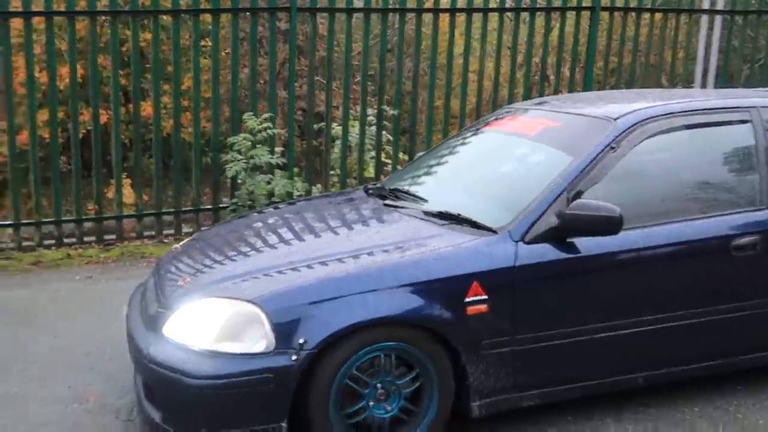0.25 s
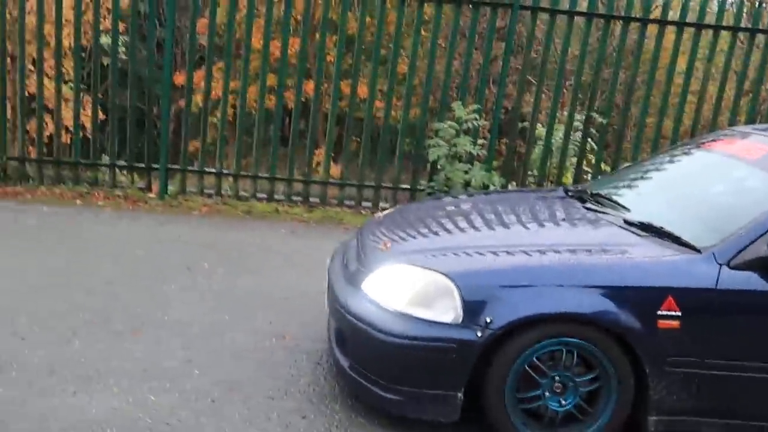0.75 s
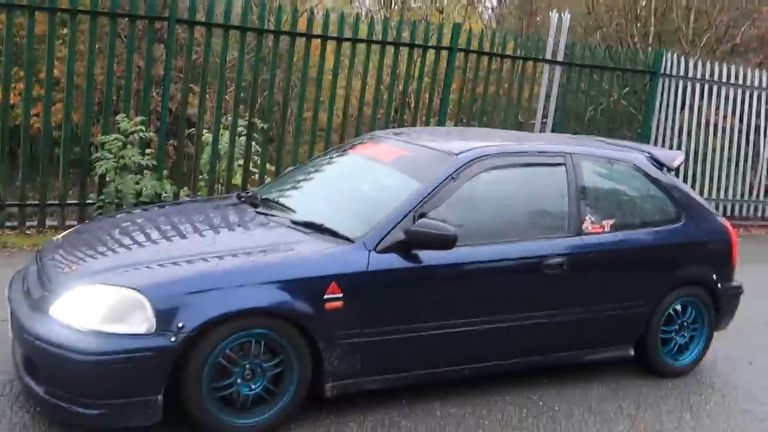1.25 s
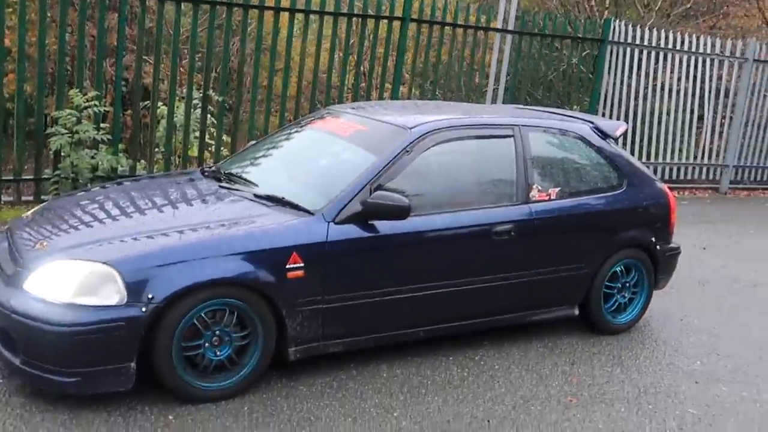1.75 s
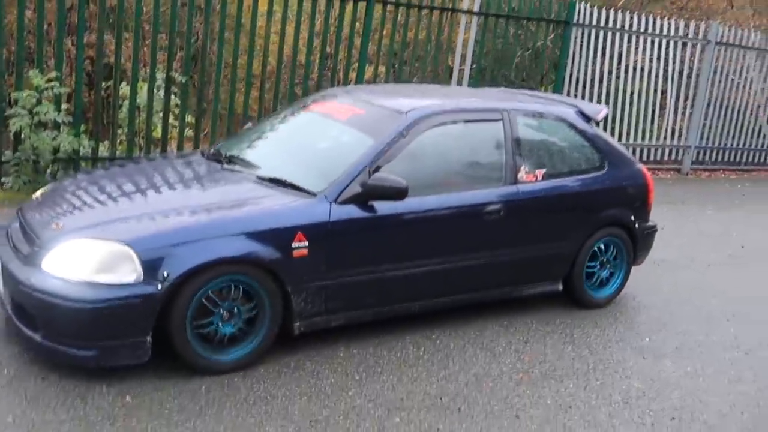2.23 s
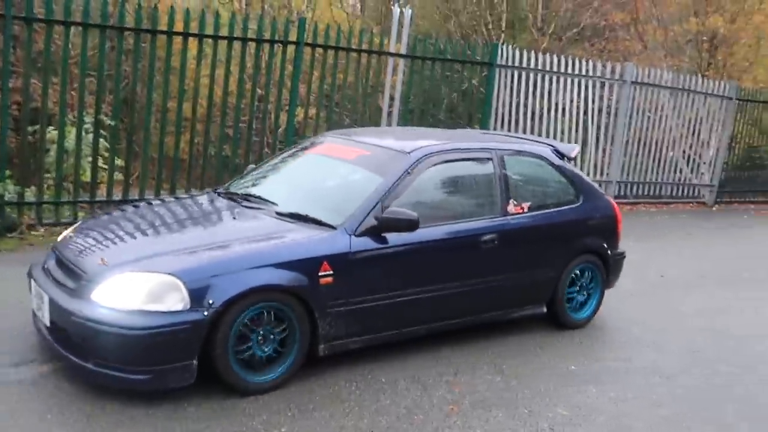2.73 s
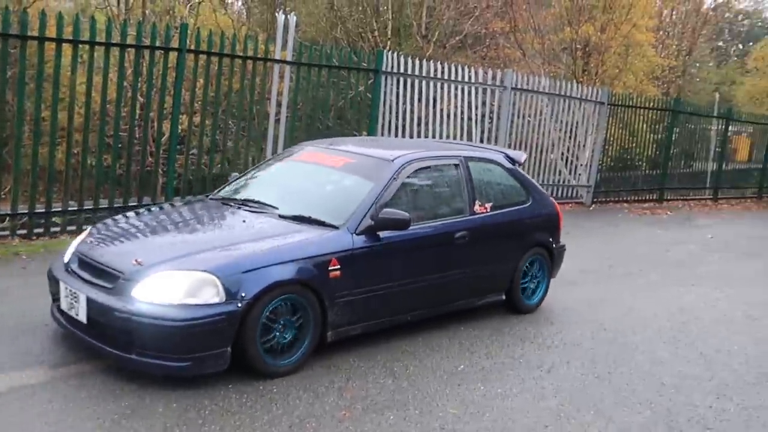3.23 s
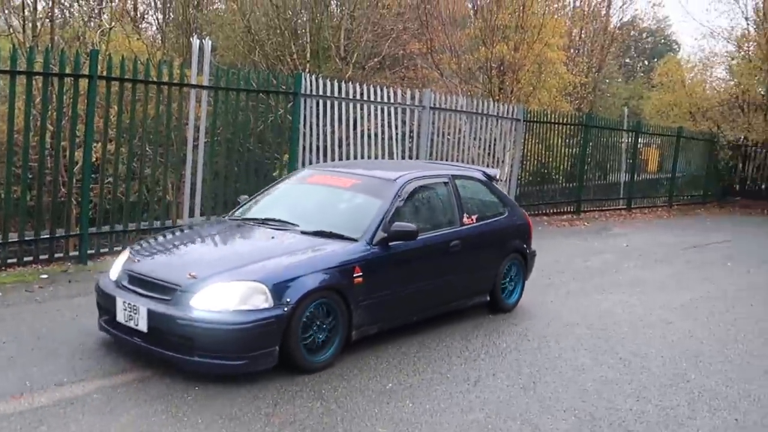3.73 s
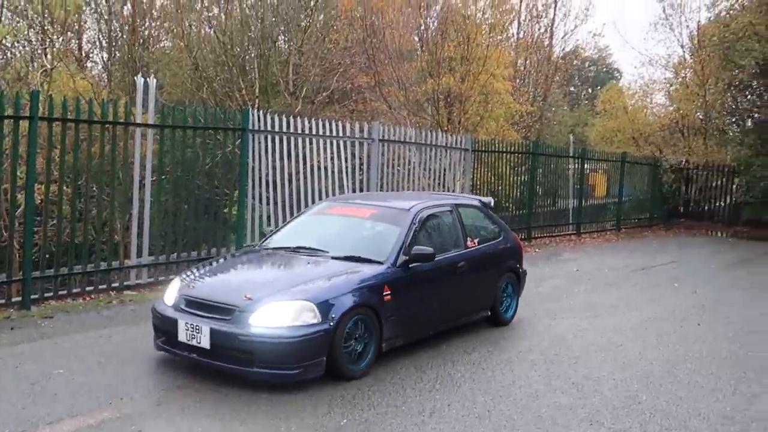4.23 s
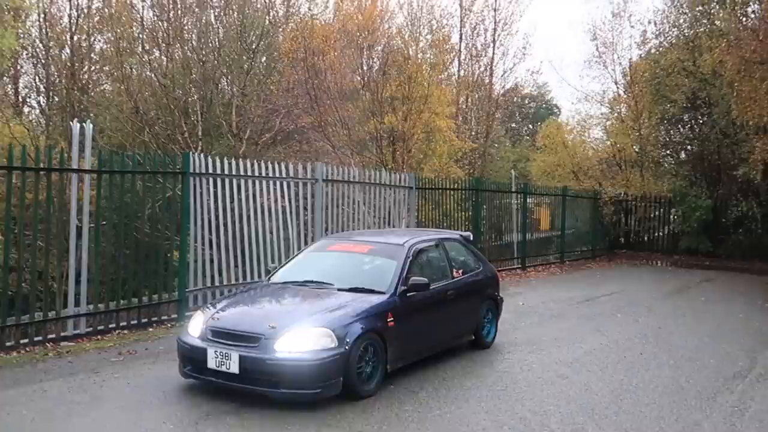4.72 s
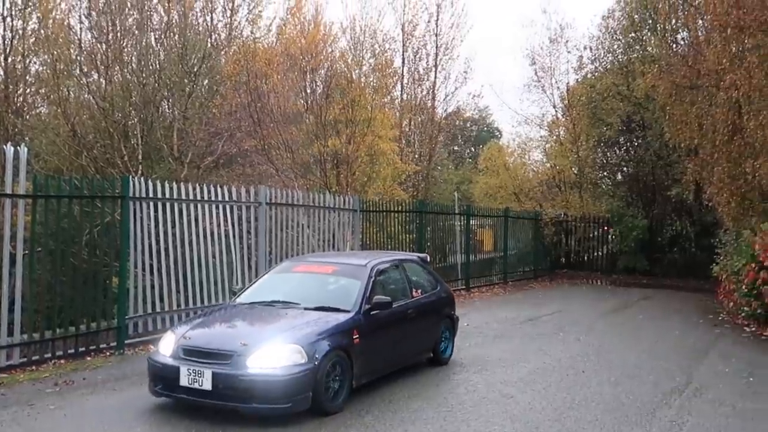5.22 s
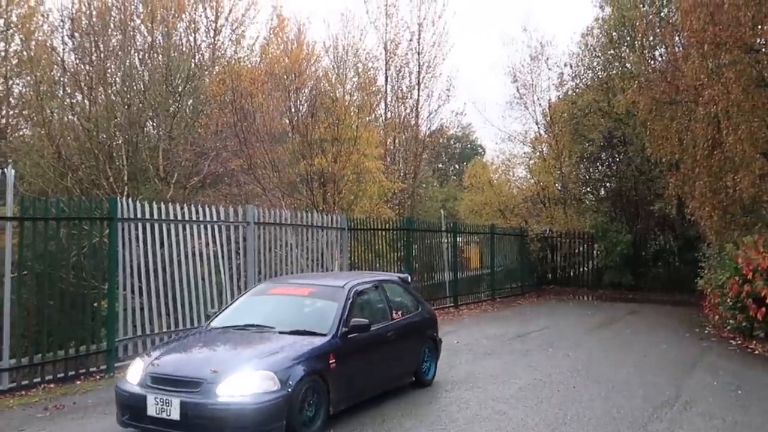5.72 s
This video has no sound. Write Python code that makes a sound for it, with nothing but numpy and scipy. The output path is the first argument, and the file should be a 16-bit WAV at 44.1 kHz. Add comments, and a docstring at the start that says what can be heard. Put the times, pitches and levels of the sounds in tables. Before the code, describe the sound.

Outdoors beside a fence, a car's deep exhaust burbles at idle with soft engine hiss. A gear knock rattles, another sharp knock follows, and the revs swell into a hollow boom, peak near the middle, then sag. After a short low lull the engine climbs steeply to a hard, buzzing roar with rushing hiss. Handheld microphone nearby, car central, little reverberation.

```python
"""Hatchback backing down a lane

A four-cylinder hatchback with a loud exhaust idles, then backs away along a fenced lane, revving and easing off.
Each firing sends a pressure pulse down the pipe, which booms near 140 and 250 Hz and rasps above, with turbulence.
Engine and tyre noise hisses, combed by the echo off the tarmac; diffuse noise differs between the ears.
Gear-case resonances clatter under short grinds as the gear goes in and takes up load; there are a few sharp snaps.
"""
import sys
import numpy as np
from scipy import signal
from scipy.fft import rfft, irfft, next_fast_len
from scipy.io import wavfile
from scipy.ndimage import uniform_filter1d

SR = 44100
rng = np.random.default_rng(int(sys.argv[2]) if len(sys.argv) > 2 else 0)


def waveform_to_disk(signal):
    """Save audio, clipped to [-1, 1], as 16-bit WAV at the path in sys.argv[1]."""
    frames = np.transpose(np.atleast_2d(signal))
    scaled = np.clip(frames, -1, 1) * 32767
    samples = np.round(scaled).astype(np.int16)
    wavfile.write(sys.argv[1], SR, samples)


N = 263277
TIME = np.arange(N) / SR

# The way to the ears as the car backs off. Each row: time in seconds, echo strength (0-1),
# extra weight under 108 Hz in dB, extra weight over 190 Hz in dB, depth of a dip in the tone (0-1).
PATH = [(0, 1, 4.5, 2.5, 0.06), (.7, 1, 3.5, 1.5, 0), (1.4, 0.6, 9, -1.5, 0.02), (1.6, 0.3, -3.5, -7, 0.15),
        (1.75, 0.04, 1, -11, 0.06), (2, 0.3, 1.5, -7.5, 0.04), (2.3, 0, 7.5, -5.5, 0.06),
        (2.5, 0, -4, -17.5, 0.4), (2.65, 0.1, 4.5, 1.5, 0.6), (2.8, 0.11, -0.5, 13, .95),
        (3.08, 0, -2, 4.5, 1), (3.2, 0.09, -11.5, -18.5, 0.3), (3.3, 0.02, 8.5, 17, 0.78),
        (3.5, 0.31, 2.5, 9, 0.2), (3.65, 0, 4.5, -6, 1), (3.8, 0, 11.5, -0.5, 0),
        (3.95, 0.7, 16.5, 6.5, 0.18), (4.2, 1, 12, 8, 0), (4.5, 0.7, 6, -4, 0.2), (4.66, 0, 7.5, 3.5, 0.4),
        (4.745, 0, -18, 6.5, 0), (4.81, 0, 5.5, -2, 0.03), (4.95, 0, 8.5, -3, 0.09), (5.1, 0, -4, 16.5, 0),
        (5.3, 0, -2, 9, 0), (5.55, 0.08, -9.5, 2.5, 0.5), (5.97, 0.2, -9, 2, 0.2)]
# Unevenness of the engine. Each row: time in seconds, unsteadiness of the firing moment (0-1),
# power share of turbulence in what drives the rasp (0-1).
ROUGHNESS = [(0, .25, .95), (1.4, .25, .95), (1.8, .08, .96), (2.45, .08, .93), (2.75, .1, .3),
             (3.1, 0, .25), (3.2, .9, .9), (3.3, .1, .4), (3.6, 0, .5), (3.74, .05, .8), (3.82, .7, .9),
             (3.9, .05, .8), (4.4, .15, .9), (4.6, .1, .8), (4.78, .2, .9), (4.9, .1, .8), (5.1, .25, .6),
             (5.2, .03, .1), (5.46, .05, .12), (5.55, .2, .6), (5.78, .06, .3), (5.97, .1, .5)]


def from_db(db):
    """Amplitude ratio of a level in dB."""
    return 10 ** (np.asarray(db) / 20)


def rms_one(x):
    """Scales the whole signal to rms 1."""
    return x / np.sqrt(np.mean(x ** 2) + 1e-20)


def evened(x, span_s):
    """Brings the running rms to 1."""
    size = round(span_s * SR)
    power = uniform_filter1d(uniform_filter1d(x ** 2, size), size)
    return x / np.sqrt(power + 1e-12)


def in_time(rows):
    """Columns of a curve table at every sample."""
    s, *columns = np.transpose(rows)
    return [np.interp(TIME, s, column) for column in columns]


def filtered(x, order, hz, kind="low"):
    """Causal Butterworth filter."""
    return signal.sosfilt(signal.butter(order, hz, kind, fs=SR, output="sos"), x)


def filtered_in_phase(x, order, hz, kind="low"):
    """Butterworth filter run both ways: no phase shift, so bands can be reweighted by adding."""
    return signal.sosfiltfilt(signal.butter(order, hz, kind, fs=SR, output="sos"), x)


def coloured(x, points):
    """Causal (minimum-phase) filter through the (Hz, dB) points, by folding the cepstrum."""
    size = 2 * next_fast_len(N // 2 + SR // 2)
    hz, db = np.transpose(points)
    grid_hz = np.maximum(np.arange(size // 2 + 1) * SR / size, 1)
    gain = from_db(np.interp(np.log(grid_hz), np.log(hz), db))
    cepstrum = irfft(np.log(gain))
    cepstrum[1:size // 2] *= 2
    cepstrum[size // 2 + 1:] = 0
    return irfft(rfft(x, size) * np.exp(rfft(cepstrum)), size)[:N]


def resonance(x, hz, width_hz):
    """Two-pole peak of gain 1."""
    r = np.exp(-np.pi * width_hz / SR)
    zeros = np.array([1, 0, -1]) * (1 - r * r) / 2
    poles = [1, -2 * r * np.cos(2 * np.pi * hz / SR), r * r]
    return signal.lfilter(zeros, poles, x)


def flicker(rate_hz):
    """Low-passed noise of rms 1, its first second dropped to skip the filter's start."""
    return rms_one(filtered(rng.standard_normal(N + SR), 2, rate_hz)[SR:])


def diffuse(knocks):
    """Noise plus a late, brightened copy of the clatter, to be added with opposite sign in the two ears."""
    # Each row: frequency in Hz, relative density in dB per Hz.
    wide_colour = [(100, -14.5), (300, -2), (700, -6), (1500, -12), (3000, -8.5), (5000, -4.5),
                   (8000, -8.5), (12000, -11.5), (15000, -16)]
    # Each row: time in seconds, level in dB.
    wide_level = [(0, -58.5), (.35, -53.5), (1.5, -54), (1.65, -63.5), (3, -63), (4.5, -61.5), (4.65, -64),
                  (5.1, -55.5), (5.97, -49)]
    level_db = in_time(wide_level)[0] + 1.5 * flicker(rate_hz=6.6)
    noise = from_db(level_db) * rms_one(coloured(rng.standard_normal(N), wide_colour))
    late_knocks = np.diff(np.roll(knocks, round(.003 * SR)), prepend=0)  # 3 ms late, brightened by the difference
    return noise + 2 * from_db(-16.5) * late_knocks


def hiss(phase):
    """Engine-bay and tyre noise throbbing with the firings, plus its echo off the tarmac; rms 1."""
    # Each row: frequency in Hz, relative density in dB per Hz.
    hiss_colour = [(400, -31), (750, -5.5), (1150, -1.5), (1400, 2.5), (1700, -6.5), (2100, -8),
                   (3000, -12), (4000, -15.5), (5500, -24.5), (8000, -30.5), (12000, -38), (15000, -56)]
    # Sooner and stronger as the car backs off. Each row: time in seconds, delay in seconds, strength (0-1).
    ground_echo = [(0, 0.00098, 0.2), (4.2, 0.00098, 0.28), (5.97, 0.00092, 0.5)]
    throb = 1 + 0.026 * np.cos(2 * np.pi * phase)
    noise = coloured(rng.standard_normal(N), hiss_colour) * throb
    delay_s, strength = in_time(ground_echo)
    noise = noise + strength * noise[np.arange(N) - (delay_s * SR).astype(int)]
    return rms_one(noise * from_db(2.1 * flicker(rate_hz=4.15)))


def snaps():
    """Single sharp snaps, among them the hard contact of a gear knock: a click through two broad resonances."""
    # Each row: start in seconds, relative level in dB, frequency in Hz.
    snap_rows = [(0.352, -28, 596), (0.367, -19, 700), (0.46, -16, 950), (1.026, -6, 610),
                 (2.045, -6, 1110), (4.631, -23, 800)]
    out = np.zeros(N)
    for start_s, level_db, hz in snap_rows:
        click = np.zeros(N)
        click[round(start_s * SR)] = from_db(level_db + 27.5)
        out += resonance(click, hz, width_hz=225) - 0.034 * resonance(click, hz=2950, width_hz=1400)
    return filtered(out, 4, 4500)


def clatter():
    """Each driveline knock starts with a sharp contact, grinds for a moment and dies; it rings the gear case."""
    # Each row: start in seconds, relative grinding level in dB, grinding time in seconds,
    # treble tilt in dB per octave.
    knocks = [(0.321, -31.5, 0.0065, -3.5), (0.472, -43, 0.022, 14), (0.7538, -20.5, 0.006, 5.5),
              (0.803, -32, 0.0049, 11), (0.808, -14, 0.012, 4), (0.828, -24.5, 0.009, 8),
              (1.108, -51, 0.045, 19.5), (2.0373, -33.5, 0.0015, 8), (2.0483, -22, 0.0043, -7),
              (3.704, -31.5, 0.0079, 10.5)]
    # Each row: frequency in Hz, width in Hz, relative level in dB.
    gearcase = [(804, 51, 13.5), (1142, 64, 21), (1570, 74, 13), (2040, 156, 6), (2680, 100, 2.5),
                (3100, 260, -2.5), (3800, 660, -5), (5060, 300, -17), (5860, 620, -26.5)]
    drop_t60_s, tail_t60_s, tail_db = 0.074, 0.54, -17
    contact_db, contact_db_per_decade = -1, -23  # at a 10 ms grind; shorter knocks are sharper
    grain_db = 0.5 * np.minimum(rng.exponential(1, N), 5)
    noise = rms_one(rng.standard_normal(N) * from_db(grain_db))
    out = np.zeros(N)
    for start_s, level_db, lasts_s, tilt_db in knocks:
        start = round(start_s * SR)
        t = np.arange(min(SR // 2, N - start)) / SR
        part = slice(start, start + len(t))
        after_s = np.maximum(t - lasts_s, 0)
        drop = from_db(-60 * after_s / drop_t60_s)
        tail = from_db(tail_db - 60 * after_s / tail_t60_s)
        blow = noise[part] * (drop + tail)
        blow[0] = from_db(contact_db + contact_db_per_decade * np.log10(lasts_s / .01))
        for k, (hz, width_hz, db) in enumerate(gearcase):
            gain = from_db(level_db + db - 4 + tilt_db * np.log2(hz / 1500))
            out[part] += gain * (-1) ** k * resonance(blow, hz, width_hz)  # alternate polarity
    return filtered(out, 2, 9000)


def firings(phase):
    """One click per firing, shared between two samples; strength set by cylinder and chance, less chance at speed."""
    # Strength of each cylinder's pulse in dB, in firing order.
    cylinder_db = [0.62, -1.3, -0.4, -1.1]
    # Delay of each cylinder's pulse in seconds, from unequal manifold branches.
    manifold_lag_s = [0, .00017, .00004, .0002]
    timing_scatter = .06  # in firing intervals, at the roughest
    strength_scatter_db = .8  # at the opening speed
    cycles = np.arange(1, int(phase[-1]))
    count = len(cycles)
    where = np.interp(cycles, phase, np.arange(N)) + SR * np.resize(manifold_lag_s, count)
    unsteadiness = np.interp(where / SR, *np.transpose(ROUGHNESS)[:2])
    chance = np.clip(rng.standard_normal(count), -3, 3)
    shift = timing_scatter * unsteadiness * np.gradient(where) * chance
    where[:-2] += shift[:-2]
    at, late = where.astype(int), where % 1
    interval = np.gradient(where)
    scatter_db = strength_scatter_db * (interval / interval[0]) ** .35 * rng.standard_normal(count)
    strength = from_db(np.resize(cylinder_db, count) + scatter_db)
    clicks = np.zeros(N)
    clicks[at], clicks[at + 1] = strength * (1 - late), strength * late
    return clicks


def echoed(x, throttle, share=1):
    """An inverted echo cuts notches at multiples of 1 / delay; hot gas at open throttle shortens it. Hollows the dip."""
    shut_s, open_s = 0.01139, 0.0089
    delay_s = shut_s + (open_s - shut_s) * throttle
    echo, _, _, dip = np.clip(in_time(PATH), 0, 1)
    x = x - share * echo * np.interp(TIME - delay_s, TIME, x)
    return x - dip * resonance(x, hz=282.2, width_hz=89)


def rasp(clicks, phase, throttle, snarl_db):
    """The upper pipe resonances, rung by the pulses and by the turbulence of each puff; running rms 1."""
    # Upper pipe resonances. Each row: frequency in Hz, relative gain in dB.
    upper_pipe = [(250, -2.5), (310, 10.5), (345, 5.5), (385, 9), (430, 1.5), (490, -2), (535, -7),
                  (580, -7.5), (660, -7.5), (820, -3), (900, -13.5), (1150, -18.5), (1450, -31),
                  (2000, -51), (8000, -100)]
    # Extra weight of the rasp under 400 Hz. Each row: time in seconds, weight in dB.
    low_weight = [(0, 0), (2.6, 5.5), (2.9, 9), (3.5, 6.5), (4.9, 0), (5.2, -5), (5.6, -1), (5.8, 15.5),
                  (5.97, 5)]
    share = in_time(ROUGHNESS)[1]
    grain_db = 2.5 * flicker(rate_hz=330)
    puffs = rms_one(rng.standard_normal(N) * from_db(grain_db))
    puffs = puffs * (1 + 0.038 * np.cos(2 * np.pi * phase))
    drive = np.sqrt(1 - share) * evened(clicks, span_s=0.043) + np.sqrt(share) * puffs
    rung = echoed(coloured(drive, upper_pipe), throttle, share=0.15)
    snarl = filtered(rung, 4, 600, "high")
    soft = filtered(rung, 4, 600)
    soft = soft + (from_db(in_time(low_weight)[0]) - 1) * filtered_in_phase(soft, 4, 400)
    return evened(soft + from_db(snarl_db) * snarl, span_s=0.14)


def boom(clicks, octaves, throttle):
    """Pulses and turbulence ring the pipe, whose peaks and notches swell and drop each passing harmonic; rms 1."""
    # What the pipe passes of a pulse. Each row: frequency in Hz, relative gain in dB.
    pipe_gain = [(15, -28.5), (30, -21.5), (50, -25.5), (65, -3.5), (85, -3.5), (105, -7), (135, 3.5),
                 (155, 2), (185, -9), (212, -11), (243, -6), (258, -6.5), (284, -15), (420, -83),
                 (2000, -110)]
    swirl_idle_db, swirl_db_per_octave, swirl_open_db = -3, -1.5, -20  # less with speed and throttle
    swirl = filtered(rng.standard_normal(N), 1, 220, "high")
    swirl_db = swirl_idle_db + swirl_db_per_octave * octaves + swirl_open_db * throttle
    rung = coloured(evened(clicks, span_s=0.35) + from_db(swirl_db) * swirl, pipe_gain)
    pipe = echoed(rung, throttle)
    thump = filtered_in_phase(pipe, 5, 108)
    growl = filtered_in_phase(echoed(rung, throttle, share=0.39), 3, 190, "high")
    low_pipe = pipe - filtered_in_phase(pipe, 3, 190, "high")
    _, thump_db, growl_db, _ = in_time(PATH)
    return rms_one(low_pipe + (from_db(thump_db) - 1) * thump + from_db(growl_db) * growl)


def scene():
    """The car reaches both ears alike; only the diffuse sound differs."""
    # Engine speed. Each row: time in seconds, firings per second.
    speed_curve = [(0, 25.8), (.4, 26), (.75, 27.1), (1.38, 27.4), (1.5, 32), (1.76, 46.8), (1.92, 49.4),
                   (2.23, 45.3), (2.35, 45.2), (2.6, 61), (2.96, 76.5), (3.15, 82), (3.31, 73.1),
                   (3.61, 63.2), (3.72, 61), (4.41, 30.6), (4.5, 42.5), (4.68, 70.5), (4.82, 102.5),
                   (4.92, 124), (5.19, 163), (5.44, 164), (5.6, 179), (5.68, 175.3), (5.8, 165.5),
                   (5.97, 167.5)]
    # What the driver does. Each row: time in seconds, throttle (0-1), level of the boom in dB.
    drive = [(0, 0.01, -19.5), (.6, 0.09, -18), (1, 0.15, -20), (1.33, 0, -22.5), (1.43, 0.06, -11.5),
             (1.6, 0.1, -5.5), (1.72, 0.3, -9.5), (1.8, 0.25, -7), (2.2, 0.25, -10), (2.35, 0.3, -7),
             (2.52, 0.2, 0), (2.7, 0.4, -15), (2.8, 0.76, -14), (3.09, 0.5, -7), (3.19, 0, -11),
             (3.29, 0.2, -24), (3.4, 0.3, -20.5), (3.6, 0.1, -9.5), (3.75, .05, -17.5), (3.9, 0.03, -19.5),
             (4.05, 0.1, -16.5), (4.24, 0, -21), (4.3, 0.11, -18), (4.39, 0, -21.5), (4.5, 0, -4.5),
             (4.61, 0.4, -9), (4.77, 0.64, -7), (4.9, 0.45, -8), (5.02, 0.64, -9.5), (5.1, 0.7, -19.5),
             (5.2, 0.94, -12), (5.5, 0.66, -4.5), (5.66, 0.7, -1.5), (5.71, 0.71, -7.5),
             (5.97, 0.82, -11.5)]
    # Each row: time in seconds, extra snarl over 600 Hz in dB, level of the hiss in dB.
    upper = [(0, 1.5, -40.5), (.35, 15.5, -42.5), (.7, 6, -40), (1.1, 4.5, -41), (1.58, 8.5, -40),
             (1.66, -18, -46), (2.2, -14, -45), (2.8, -13, -42.5), (3.2, -21, -42), (3.5, -5.5, -43.5),
             (4.0, 1, -39.5), (4.535, -1.5, -38), (4.55, -14, -42), (4.62, -13, -44.5), (4.64, 16, -39),
             (4.8, 11, -40), (5.05, 8, -37.5), (5.25, 3.5, -29), (5.45, 9, -32.5), (5.6, 7.5, -36),
             (5.8, 16, -28.5), (5.97, 14, -24)]
    rasp_shut_db, rasp_open_db = -40, 21.5  # level at shut throttle, and what full throttle adds
    speed = uniform_filter1d(in_time(speed_curve)[0], round(.04 * SR))  # the flywheel rounds changes over 40 ms
    phase = np.cumsum(speed) / SR + .99  # in firings
    octaves = np.log2(speed / speed[0])
    throttle, boom_db = in_time(drive)
    throttle = np.clip(throttle, 0, 1)
    snarl_db, hiss_db = in_time(upper)
    clicks, knocks = firings(phase), clatter()
    wide = diffuse(knocks)
    car = from_db(hiss_db) * hiss(phase)
    car += from_db(rasp_shut_db + rasp_open_db * throttle) * rasp(clicks, phase, throttle, snarl_db)
    car -= from_db(boom_db) * boom(clicks, octaves, throttle)  # inverted
    mid = car + knocks + snaps()
    return np.array([mid + wide, mid - wide])


def record(dry):
    """The deepest bass is lost, peaks are rounded, the top is cut."""
    dry = filtered(dry, 1, 12, "high")
    rounded = np.tanh(dry / 1.035)
    return signal.sosfilt(signal.cheby2(12, 70, 15200, fs=SR, output="sos"), rounded)  # 70 dB down from 15.2 kHz


dry = scene()
out = record(dry)
waveform_to_disk(out)
```